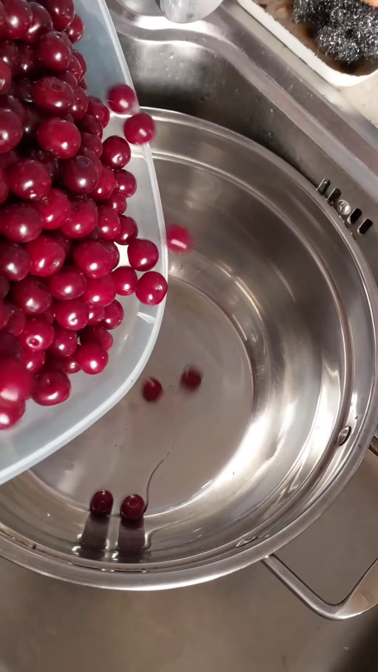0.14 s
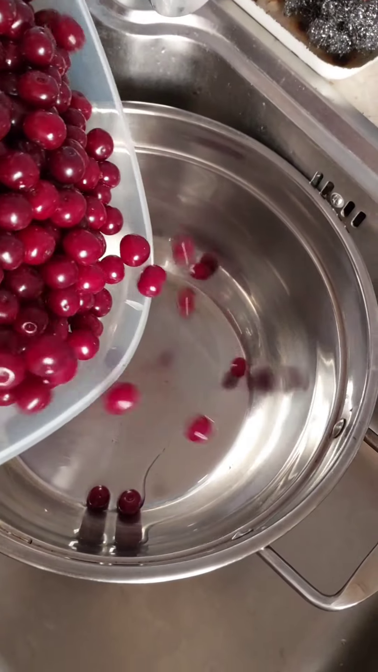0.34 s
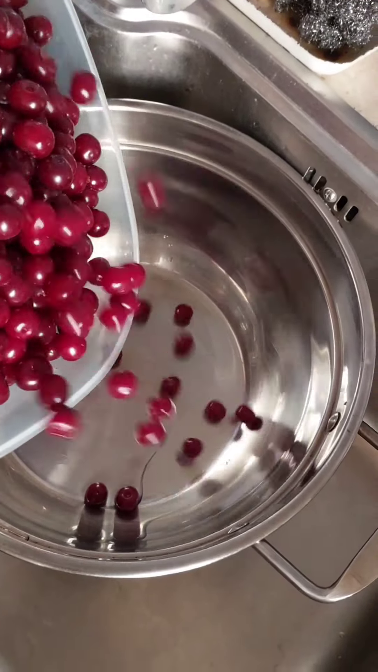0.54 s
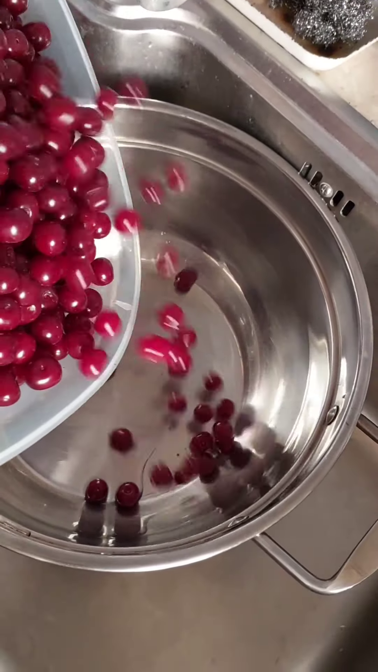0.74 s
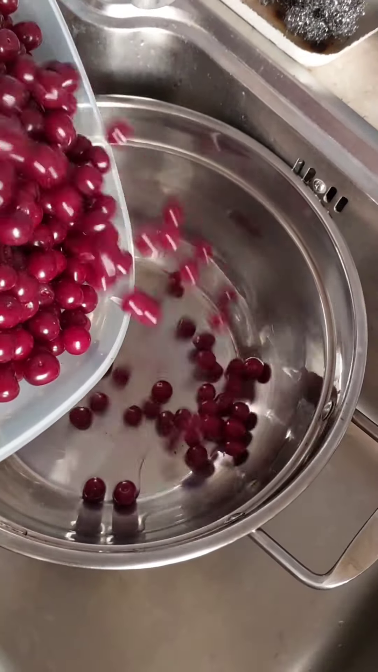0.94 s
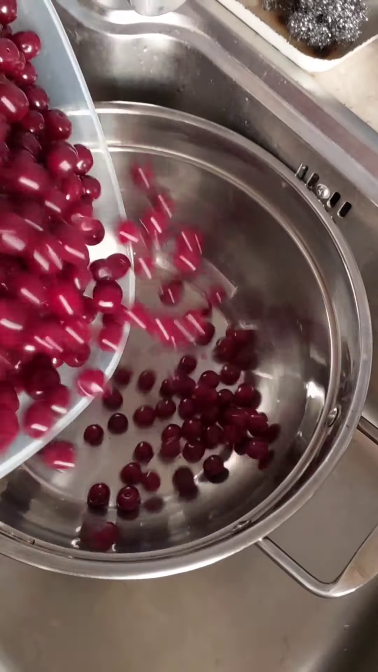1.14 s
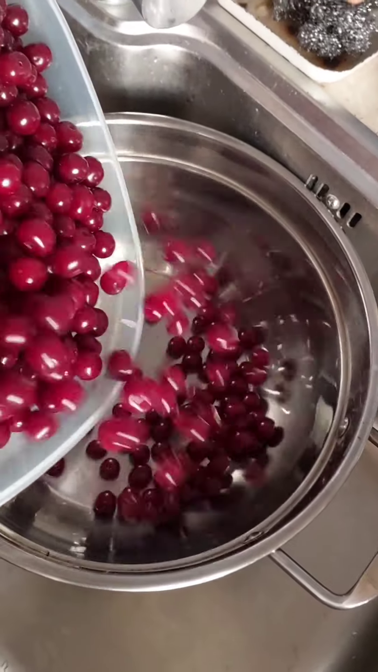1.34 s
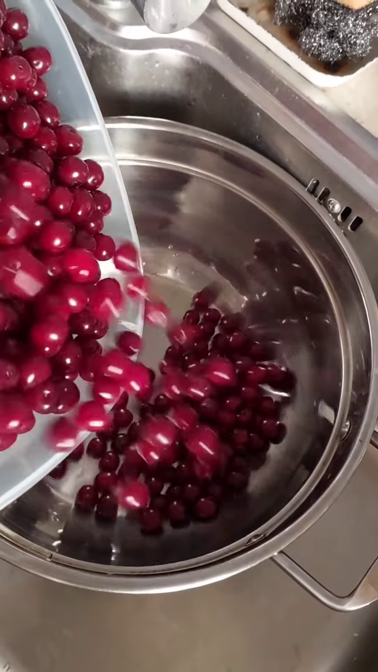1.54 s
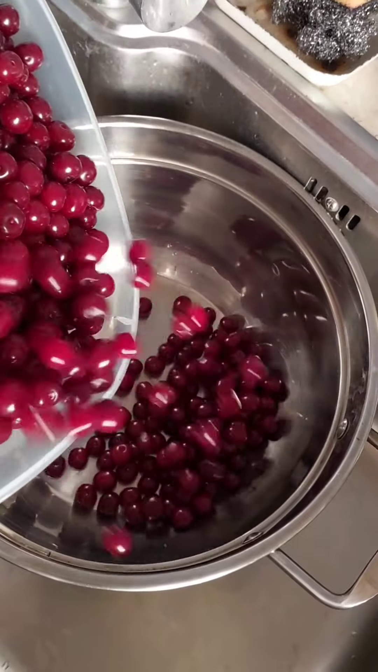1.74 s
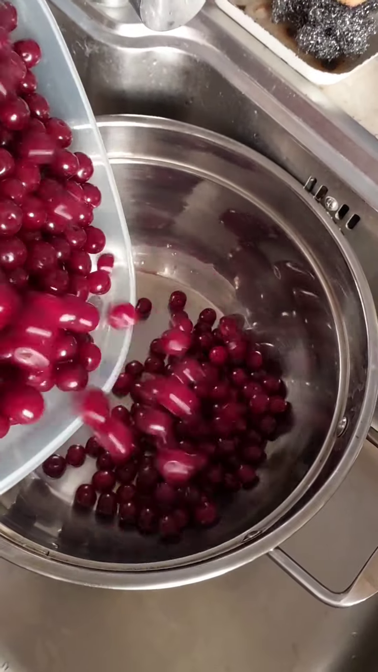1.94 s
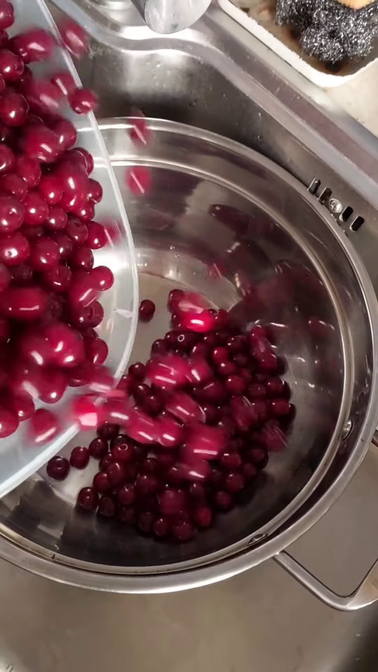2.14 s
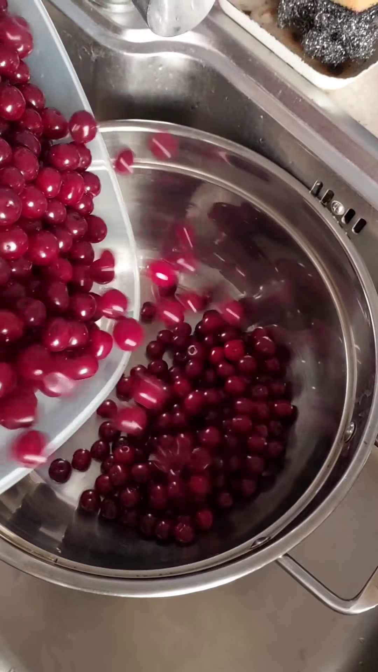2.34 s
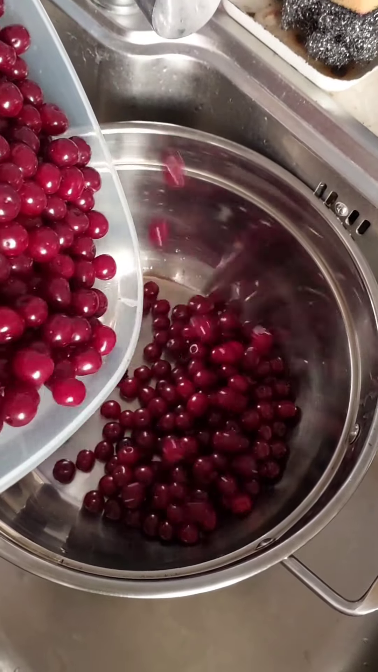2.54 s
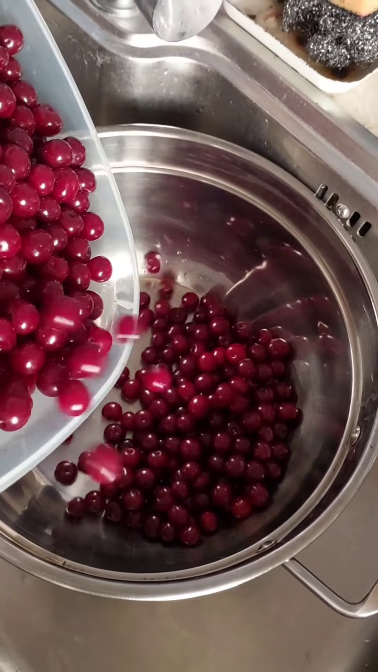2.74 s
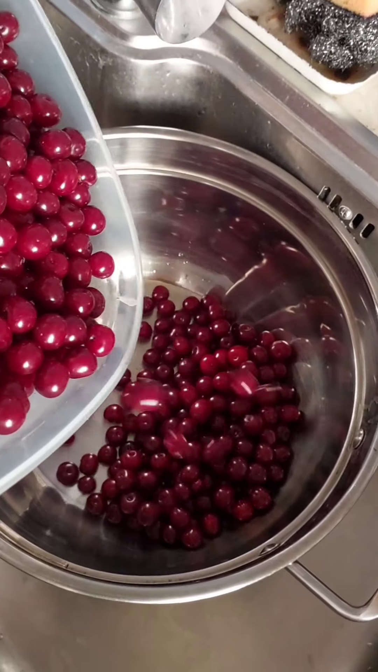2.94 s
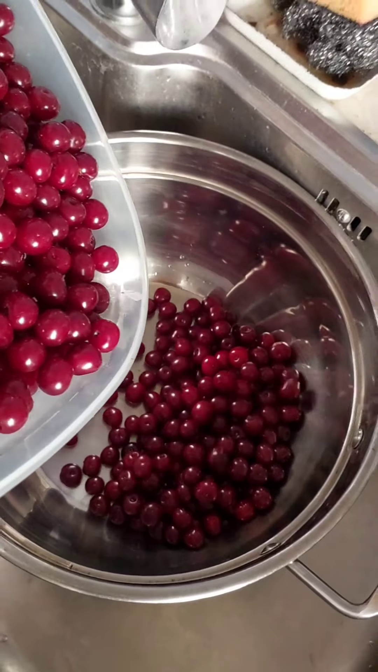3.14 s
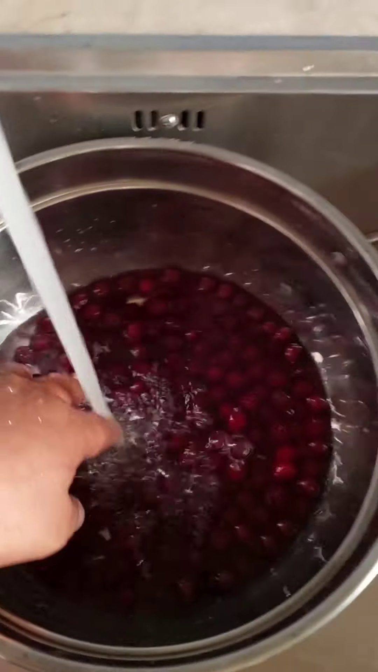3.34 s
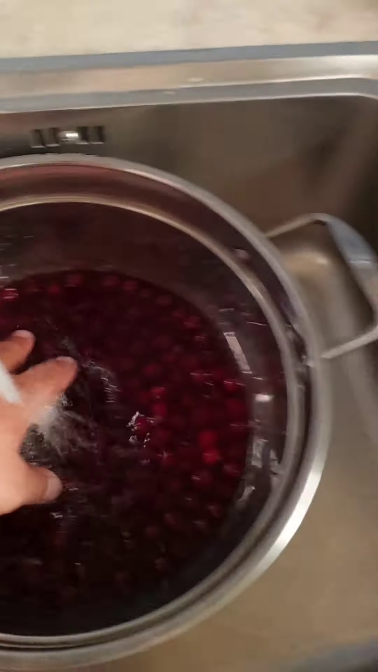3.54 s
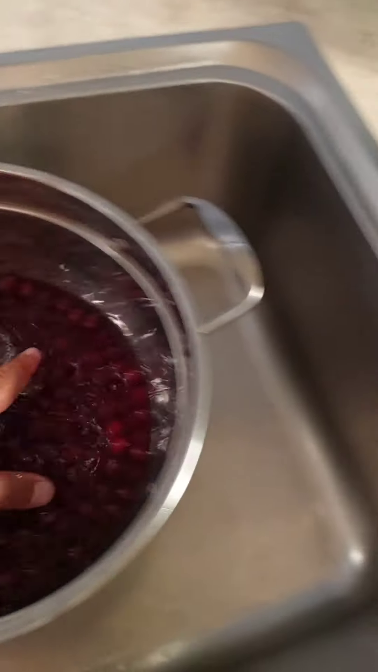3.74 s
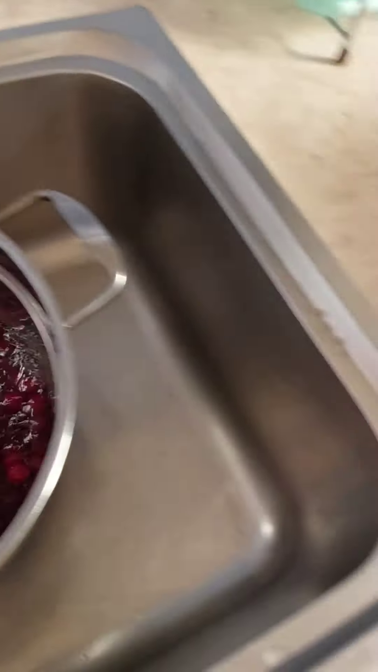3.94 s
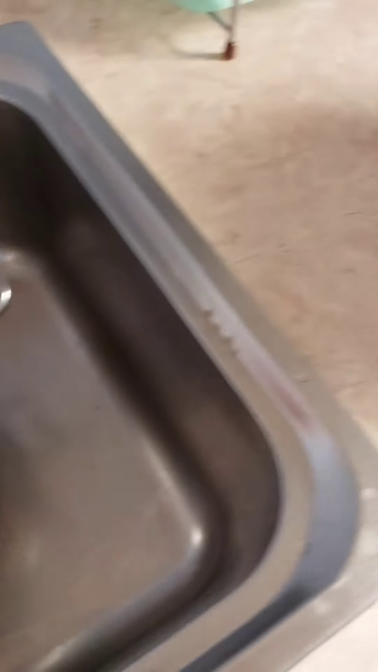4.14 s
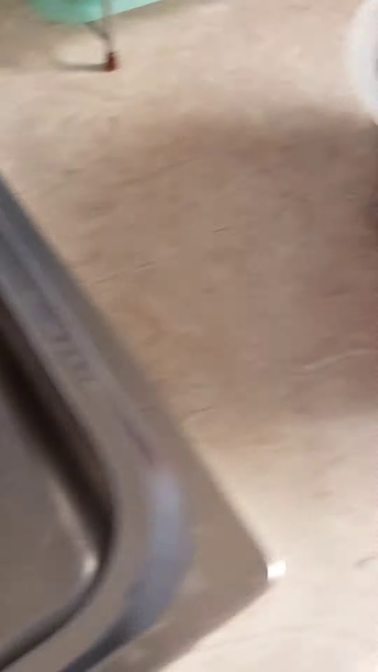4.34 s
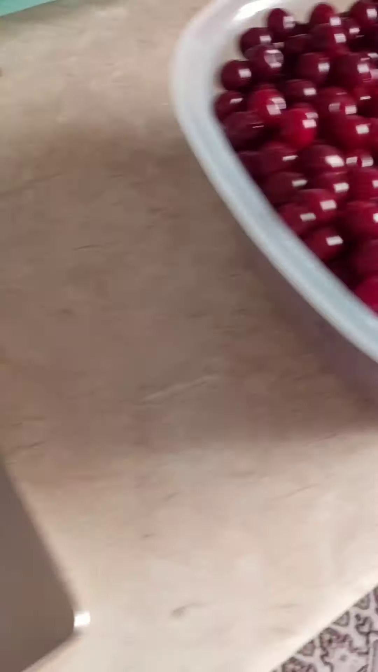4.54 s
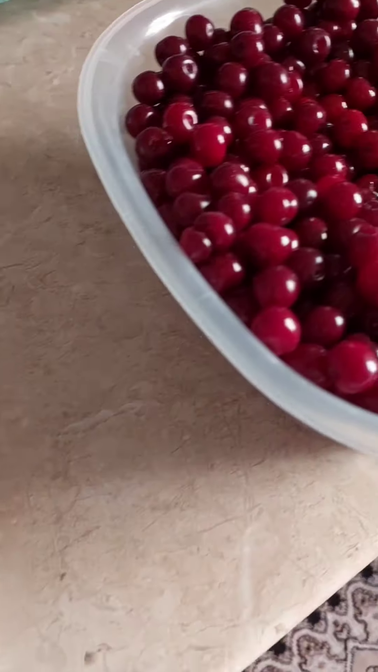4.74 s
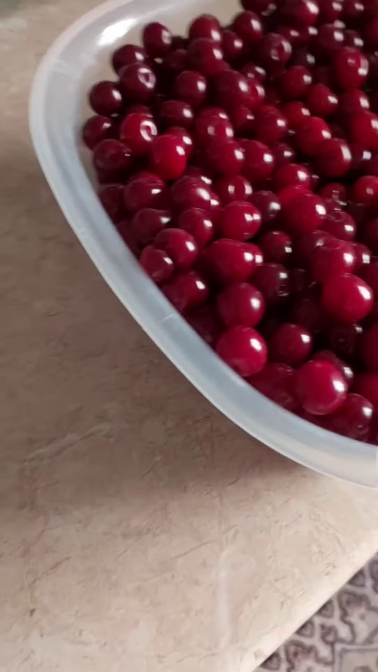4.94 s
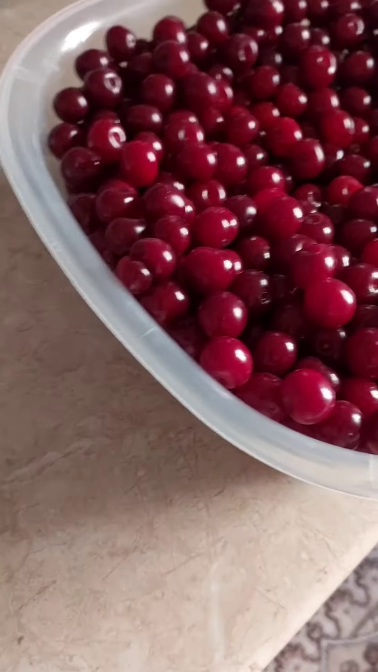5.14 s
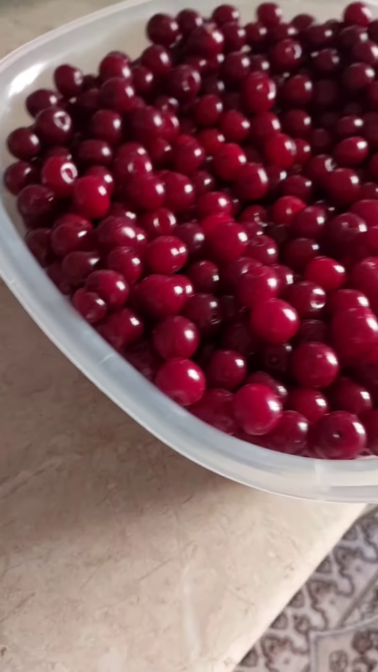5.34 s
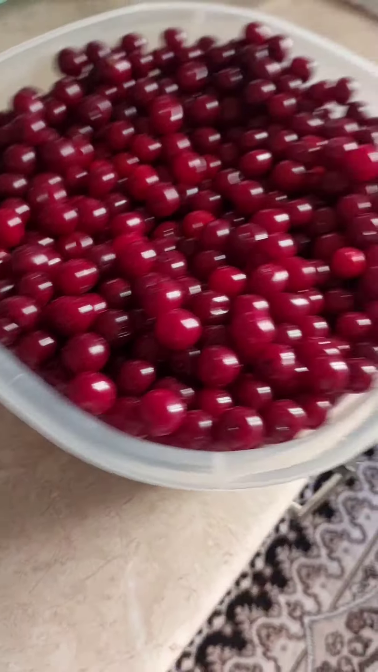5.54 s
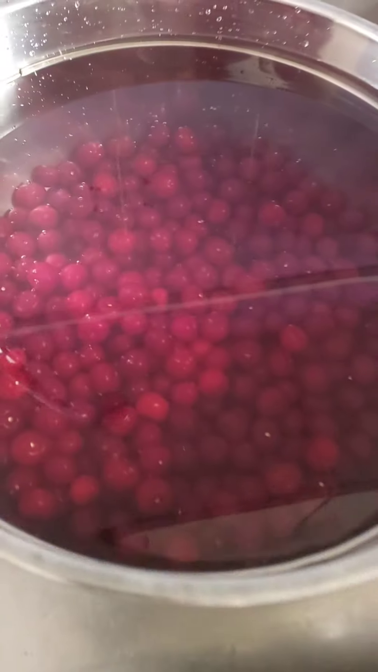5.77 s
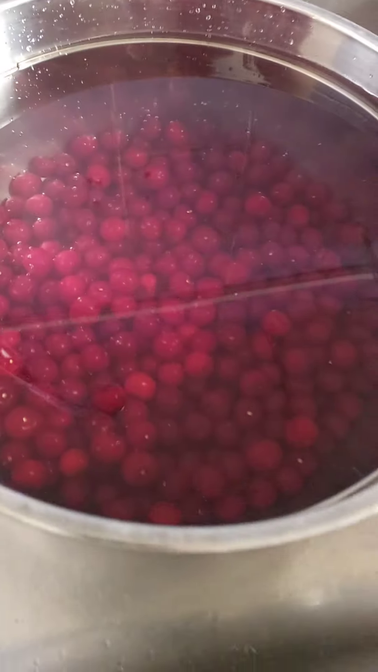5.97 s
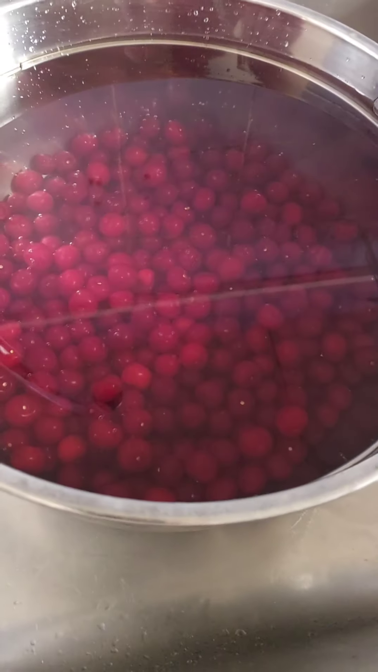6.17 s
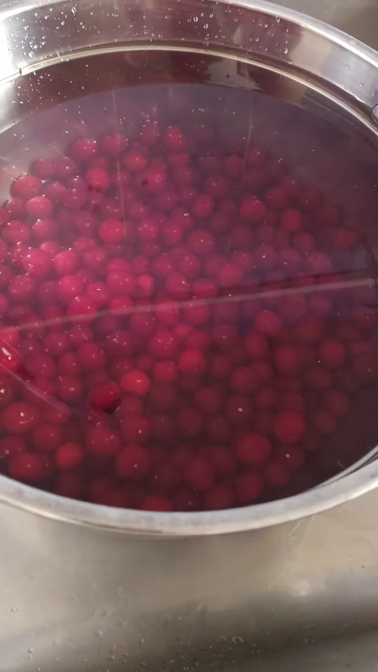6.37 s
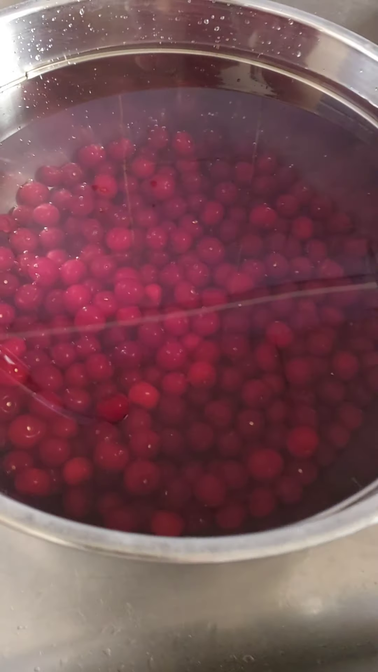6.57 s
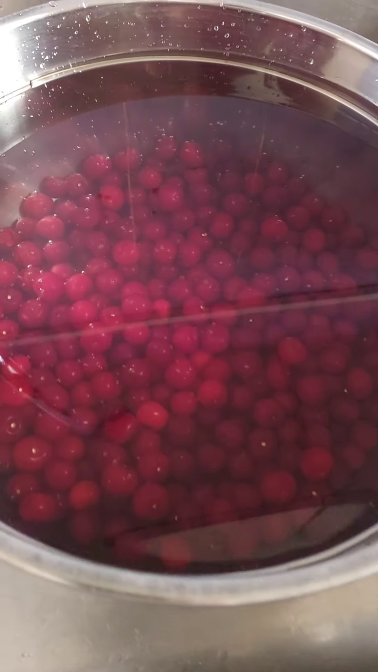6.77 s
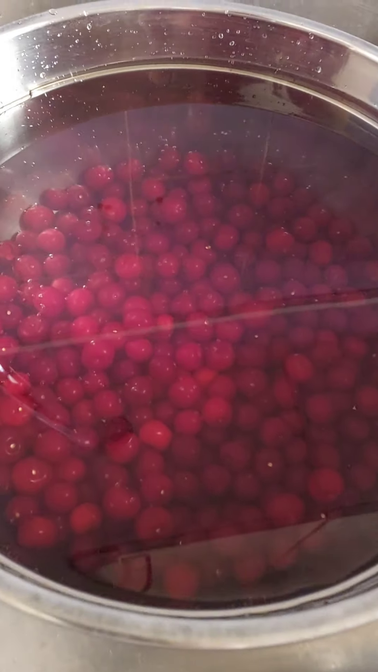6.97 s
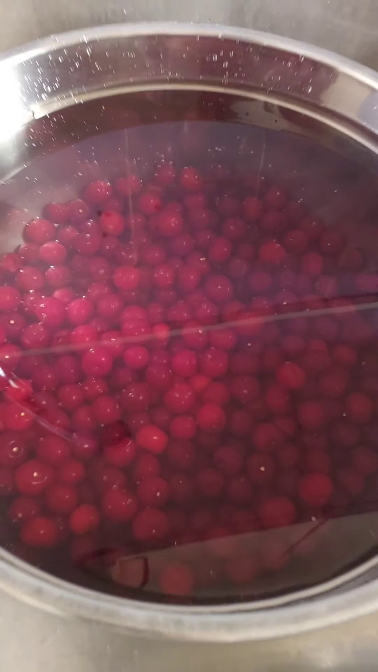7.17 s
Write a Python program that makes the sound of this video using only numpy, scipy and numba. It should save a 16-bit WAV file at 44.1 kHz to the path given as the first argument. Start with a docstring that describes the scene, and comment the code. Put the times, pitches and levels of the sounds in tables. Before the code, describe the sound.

Cherries patter and thud into a steel pot in a sink, then tap water splashes and gurgles before cutting abruptly to faint fridge hum.

```python
"""Cherries tumble from a plastic tub into a steel pot in a sink: thuds plus decaying modes, duller where
fruit covers the base, with filtered-noise skins, squeaks, taps and wall clacks.
Tap water splashes and gurgles into the pot over a stirring hand: swarms of short sines, echoed and
coloured, with an air pocket, big glugs and a ringing hollow. It stops abruptly.
After a near-silent blink only the kitchen is left: fridge hum, whirr and whine over room air."""
import sys
import numpy as np
from scipy import signal
from scipy.fft import rfft, irfft, next_fast_len
from scipy.io import wavfile
from numba import njit

SR = 44100
rng = np.random.default_rng(int(sys.argv[2]) if len(sys.argv) > 2 else 0)


def wrap_up_sound(samples):
    """Save the sound to the file named by the first command line argument, as 16-bit audio."""
    columns = np.atleast_2d(samples).T
    # keep every value between -1 and 1, then stretch to whole-number steps
    tamed = np.clip(columns, -1, 1)
    steps = np.round(tamed * 32767).astype(np.int16)
    wavfile.write(sys.argv[1], SR, steps)


N = 317914
TIME = np.arange(N) / SR
SIDES = np.array([[1], [-1]])  # left, right
TAP_ON_S, TAP_OFF_S = 3.186, 5.602

# Table levels are relative: functions add their own offsets.
# heavy cherries landing: t/s, level/dB, thud f/Hz, ring/dB (high on bare steel, low on fruit)
LANDINGS = [(0.01, -41.5, 276, -28), (0.045, -48, 327, -42), (0.259, -45.5, 383, -25),
            (0.318, -26, 480, -4.5), (0.383, -27.5, 525, 1), (0.417, -23, 500, -12),
            (0.434, -31.5, 450, -5), (0.455, -34, 410, -12), (0.497, -28, 396, -7), (0.53, -31.5, 414, -1),
            (0.545, -20, 540, -5), (0.571, -42, 480, -13), (0.612, -26, 456, 1), (0.644, -31, 380, -6),
            (0.667, -25.5, 523, 2), (0.683, -30, 540, 0), (0.7083, -24, 490, -6), (0.741, -31, 420, -12),
            (0.7605, -22.5, 553, 1.5), (0.795, -27, 500, -11), (0.826, -22.5, 530, -1.5),
            (0.867, -27, 298, 4.5), (0.884, -27.5, 395, -15), (0.903, -43, 360, -10), (0.937, -30, 510, -3),
            (0.961, -32, 340, -5), (0.987, -22.5, 529, -22), (1.024, -30.5, 504, 2),
            (1.039, -30.5, 430, 0.5), (1.076, -29, 315, -16), (1.113, -26.5, 338, -2),
            (1.129, -23, 360, -16), (1.155, -30, 524, -2), (1.172, -41, 420, 8), (1.196, -27.5, 507, 0.5),
            (1.22, -31, 397, 2), (1.246, -25.5, 545, 3), (1.261, -28.5, 480, 5.5), (1.29, -27, 378, -13),
            (1.325, -28, 508, -30), (1.359, -23.5, 297, -9.5), (1.383, -33, 400, -13),
            (1.426, -26.5, 505, -6), (1.457, -29.5, 356, -12), (1.494, -29, 306, -10),
            (1.523, -31, 350, -17), (1.549, -31.5, 393, -6.5), (1.594, -42, 414, -23),
            (1.625, -21, 345, -16), (1.663, -26.5, 343, -13.5), (1.689, -24.5, 370, -29),
            (1.706, -34, 360, -16), (1.7357, -34, 480, -15), (1.758, -40, 370, -18),
            (1.786, -27.5, 445, -8.5), (1.836, -35, 400, -22), (1.882, -45, 310, -30),
            (1.95, -36.5, 312, -25), (2.022, -28, 407, -15), (2.051, -28, 378, -16), (2.156, -24, 385, -13),
            (2.17, -28, 417, -22.5), (2.236, -29.5, 443, -11), (2.271, -37, 450, -17),
            (2.316, -30.5, 507, -12), (2.39, -28, 557, -8), (2.446, -41, 298, -20), (2.584, -39.5, 341, -5),
            (2.629, -43, 304, -7), (2.677, -41, 304, -18), (2.861, -37.5, 372, -21), (2.909, -47, 298, -23),
            (2.996, -49.5, 303, -27), (3.054, -39.5, 368, -31)]
# wet skins smacking: t/s, level/dB, hardness/dB (high = knock on steel, low = crackle of skin on skin)
SKIN_SMACKS = [(0.3169, -51, -2.5), (0.381, -51.5, 6), (0.418, -47.5, -11.5), (0.4965, -49, 9.5),
               (0.532, -44, 6), (0.615, -33.5, 2), (0.6628, -41.5, -9), (0.678, -40, 1), (0.706, -42.5, 4),
               (0.744, -47, -7), (0.761, -48, 8.5), (0.8244, -49.5, 7), (0.87, -38, 1.5), (0.934, -48.5, 5),
               (1.0051, -46, -17), (1.035, -45, 6), (1.115, -43, 2.5), (1.151, -52, 0),
               (1.194, -37.5, -7.5), (1.236, -39, -3), (1.258, -37.5, -5.5), (1.327, -40, -7.5),
               (1.492, -39.5, -6), (1.079, -51, 4), (1.464, -53, 7), (1.629, -64, -2), (1.737, -63.5, 0),
               (1.833, -42, -4), (1.9101, -55.5, -6), (1.9568, -50, -8), (2.026, -49, -2),
               (2.1854, -51.5, -11), (2.315, -45.5, -5), (2.332, -46.5, -6), (2.359, -42.5, -6),
               (2.389, -45, -9), (2.4455, -56, -10), (2.5822, -58, 2.5), (2.638, -54.5, -5),
               (2.929, -65.5, -1)]
# modes of the pot base and sink: f/Hz, level/dB, t60/s without fruit
BASE_MODES = [(57.3, -6.5, 0.71), (83.3, -3.5, 0.15), (103, -4, 0.29), (140, -10.5, 0.36),
              (189.7, -9, 0.51), (234.7, -12, 0.38), (260, -11, 0.17), (299.7, -7.5, 0.22),
              (324, -4.5, 0.08), (398.5, -10, 0.49), (464, -1, 0.08), (519, -3.5, 0.14), (550.5, -10, 0.16),
              (647, -12, 0.065), (847, -9.5, 0.15), (907, -5.5, 0.2), (872, -12.5, 0.1), (937, -10, 0.12),
              (1015, -8, 0.063)]
# fruit leaving the tub: t/s, flow/dB
FLOW = [(0.0, -60), (0.34, -48), (0.49, -43), (0.57, -29.5), (0.72, -34.5), (1.56, -34), (1.93, -39),
        (2.28, -32.5), (2.85, -52.5), (3.15, -55)]
# cover by fruit, fullest mid-pour: t/s, share of the pot base covered/0-1
COVER = [(0.4, 0.27), (1.27, 0.44), (1.45, 0.5), (2.4, 0.33)]
# splashing as the hand stirs under the jet: t/s, level/dB
SPLASHING = [(3.21, -38.5), (3.33, -36), (4.24, -37), (4.33, -31.5), (4.38, -43), (4.79, -42),
             (4.88, -35.5), (5.09, -47), (5.2, -40), (5.22, -28.5), (5.33, -47.5), (5.34, -36), (5.45, -43),
             (5.5, -32.5), (5.53, -42), (5.58, -40)]


def undb(db):
    """Decibels to amplitude ratio."""
    return 10 ** (np.asarray(db) / 20)


def unit(x):
    """Scale to rms 1."""
    return x / np.sqrt(np.mean(x ** 2) + 1e-20)


def curves(table, at=TIME):
    """Value columns of a table, interpolated at the given times."""
    s, *columns = np.transpose(table)
    return [np.interp(at, s, c) for c in columns]


def on_log_axis(hz, points):
    """Read (f/Hz, value) points on a log-frequency axis."""
    f, value = np.transpose(points)
    return np.interp(np.log(hz + 1e-3), np.log(f), value)


def colour(x, points):
    """Minimum-phase filter with the gain of (f/Hz, gain/dB) points, built from the cepstrum."""
    size = 4096
    hz = np.arange(size // 2 + 1) * SR / size
    cepstrum = irfft(np.log(undb(on_log_axis(hz, points))))
    cepstrum[1:size // 2] *= 2
    cepstrum[size // 2 + 1:] = 0
    impulse = irfft(np.exp(rfft(cepstrum)))
    return signal.fftconvolve(x, impulse[None], axes=1)[:, :x.shape[1]]


def place(x, pan):
    """Lean each frequency left or right by (f/Hz, left minus right/dB) points."""
    size = 2 ** 19
    hz = np.arange(size // 2 + 1) * SR / size
    gain = undb(SIDES * on_log_axis(hz, pan) / 2)
    return irfft(rfft(x, size) * gain)[:, :N]


def band(x, lo_hz, hi_hz, order=2):
    """Butterworth band-pass."""
    edges_hz = [lo_hz, min(hi_hz, .45 * SR)]
    return signal.sosfilt(signal.butter(order, edges_hz, "band", fs=SR, output="sos"), x)


def diffuse(apart_hz):
    """Noise alike at both ears in the bass, differing in the treble."""
    mid, side = rng.standard_normal((2, N))
    return mid + SIDES * signal.sosfilt(signal.butter(1, apart_hz, "high", fs=SR, output="sos"), side)


def between(start, end):
    """Gate with 4 ms edges."""
    return np.clip((TIME - start) / .004, 0, 1) * np.clip((end - TIME) / .004, 0, 1)


def add(out, s, sound):
    """Mix a sound in at time s."""
    i = int(np.clip(s * SR, 0, N - 1))
    out[:, i:i + sound.shape[1]] += sound[:, :N - i]


@njit
def grains(start, hz, cycles, size, glide, phase):
    """Decaying sines whose pitch rises by the share glide; the right ear gets its own phase."""
    out = np.zeros((2, N))
    for k in range(len(start)):
        length = int(cycles[k] * SR / hz[k]) + 2
        turn = 2 * np.pi * hz[k] / SR
        p = np.exp(1j * turn - 6. / length)
        rise = np.exp(1j * turn * glide / length)
        z = size[k] / np.sqrt(length) + 0j
        right = np.exp(1j * phase[k])
        first = int(start[k] * SR)
        for i in range(max(first, 0), min(first + length, N)):
            out[0, i] += z.imag
            out[1, i] += (z * right).imag
            z *= p
            p *= rise
    return out


def room(x, wet_db, t60_s):
    """Close steel and tile add a short dense tail: decaying band-limited noise."""
    t = np.arange(int(.5 * SR)) / SR
    tail = band(rng.standard_normal((2, len(t))), 346, 13000, order=1)
    tail = tail * np.exp(-np.log(1000) * t / t60_s) * np.minimum(t / 0.0028, 1)
    tail = band(tail, 160.0, 14900)
    tail /= np.sqrt(np.sum(tail ** 2) / 2)
    return x + undb(wet_db) * signal.fftconvolve(x, tail, axes=1)[:, :N]


def kitchen(hum_hz=63.6, hum_db=-44, early_db=-49, late_db=-47, rumble_db=-56, whine_hz=2620, whine_db=-84):
    """Wavering fridge hum and rumble over coloured air; a faint whine early, whirr bands at the end."""
    # air during pour and tap, then at the end: f/Hz, gain/dB
    air_early = [(50, -25), (85, -9), (99, -6.5), (113, -18.5), (183, -23.5), (338, -26), (440, -34),
                 (611, -29.5), (1260, -42.5), (3160, -64), (16000, -69)]
    air_late = [(50, -59), (85, -9.5), (129, 5.5), (204, -12), (266, -6), (369, -10.5), (403, -15.5),
                (470, -11), (906, -15.5), (1670, -22.5), (3160, -26), (4590, -29), (9250, -39.5),
                (11800, -38.5), (16000, -52)]
    # late whirr resonances: f/Hz, width/Hz, level/dB
    whirr_bands = [(122.5, 9.7, -58.5), (261, 40, -63), (461, 16, -59.5), (1488, 33, -61),
                   (1653, 320, -54.5), (4600, 280, -65.5), (5700, 620, -65.5), (6580, 480, -69),
                   (11530, 350, -74.5)]
    waver = unit(band(rng.standard_normal(N), 0.3, 0.94, order=1))
    phase = 2 * np.pi * np.cumsum(hum_hz + .5 * waver) / SR
    hum = np.sqrt(2) * np.sin(phase) * undb(hum_db)
    rumble = undb(rumble_db) * unit(band(diffuse(900), 25.0, 122, order=3))
    early = undb(early_db) * unit(colour(diffuse(650), air_early))
    early += undb(whine_db) * unit(band(diffuse(650), whine_hz - 35, whine_hz + 35))
    late = undb(late_db) * unit(colour(diffuse(630), air_late))
    for hz, width, db in whirr_bands:
        late += undb(db) * unit(band(diffuse(360), hz - width / 2, hz + width / 2))
    late = (late + whine()) * undb(SIDES * 0.74)
    return hum + rumble + np.where(TIME < TAP_OFF_S, early, late)


def skins(smack_db=3, knock_db=-2, crackle_db=-9, snap_s=0.01, slide_s=0.0066, slide_db=-7, rough_db=2.5,
          rustle_db=-28, rustle_cover_db=12):
    """Wet skins snap and slide in tiny slips over a rustle: gritty noise in three enveloped bands."""
    # f/Hz, gain/dB
    skin_gain = [(760, -39), (1300, -3), (1570, 7), (1730, -4), (1880, 4), (2110, -4.5), (2630, 5),
                 (3040, -10), (3680, 2), (3960, -1), (5480, 4), (8000, -14), (11700, -10), (16000, -15.5)]
    t = np.arange(int(.15 * SR)) / SR
    decay = np.exp(-t / snap_s) + undb(slide_db) * np.exp(-t / slide_s)
    shape = np.minimum(t / 0.0029, 1) * decay
    envelopes = np.zeros((3, N))  # power per band
    for s, db, hardness in SKIN_SMACKS:
        tilt = np.array([[knock_db + hardness], [0], [crackle_db - hardness]])
        add(envelopes, s, (undb(smack_db + db + tilt) * shape) ** 2)
    ticks = unit(undb(5 * np.repeat(rng.standard_normal(N // 160 + 1), 160)[:N]))
    rustle = ticks * undb(curves(FLOW)[0] + rustle_db + rustle_cover_db * curves(COVER)[0])
    envelopes += (rustle * undb([[-3], [-2], [-4]])) ** 2
    slips = undb(rough_db * np.repeat(rng.standard_normal(N // 32 + 1), 32)[:N])
    grit = colour(rng.standard_normal((2, N)) * slips, skin_gain)
    bands_hz = (1070, 3540), (3010, 7000), (8600, 21000)
    parts = [band(grit, lo, hi, order=3) for lo, hi in bands_hz]
    return sum(unit(part) * np.sqrt(e) for part, e in zip(parts, envelopes))


def clicks(click_db=-4.0, crack_db=-2, crack_s=0.0042, rattle_db=-12, rattle_range_db=9, low_hz=1300,
           high_hz=5200, ring_cycles=6):
    """Cherries tap each other and the wall: short sine plus noise crack; a random rattle follows the flow."""
    # sharp taps: t/s, level/dB, f/Hz
    taps = [(1.152, -31, 3470), (1.24, -39, 2620), (1.3278, -33, 1980), (1.4966, -32, 2730),
            (1.574, -61, 2300), (1.670, -44, 1490), (1.688, -37.5, 1860), (1.705, -38, 1750),
            (1.817, -40, 3460), (1.8375, -39, 1510), (1.9964, -50, 1530), (2.0274, -35, 2700),
            (2.032, -38, 2740), (2.061, -54, 2550), (2.186, -47, 1220), (2.3155, -39, 2900),
            (2.334, -43, 2570), (2.357, -41, 2650), (2.37, -42, 2700), (2.4463, -41, 3270),
            (2.478, -57, 2750), (2.5825, -65, 1570)]
    t = np.arange(int(.08 * SR)) / SR
    when, size, pitch = rng.random(size=(260, 3)).T
    when = when * TAP_ON_S
    level = curves(FLOW, when)[0] + rattle_db - rattle_range_db * size
    rattle = np.column_stack([when, level, low_hz * (high_hz / low_hz) ** pitch])
    out = np.zeros((2, N))
    for s, db, hz in np.vstack([taps, rattle]):
        tick = np.sin(2 * np.pi * hz * t + SIDES * rng.uniform(-4.4, 1)) * np.exp(-t * hz / ring_cycles)
        crack = unit(band(rng.standard_normal((2, len(t))), hz / 1.26, hz * 1.65)) * np.exp(-t / crack_s)
        add(out, s, undb(db + click_db) * (tick + undb(crack_db) * crack))
    return out


def squeaks(squeak_db=1, overtone_db=-4.0, start_hz=5150, end_hz=6200, rise_s=0.01126, peak_s=0.0089,
            rasp_db=-1):
    """Skin sticks and slips on skin, unevenly and ever faster: a wobbling rising tone, octave and rasp."""
    # wet skins squeezing past each other: t/s, level/dB
    squeezes = [(0.003, -57), (0.038, -61.5), (0.416, -49.5), (0.775, -37.5), (0.802, -45), (0.9815, -38),
                (1.0023, -44), (1.1266, -45), (1.186, -35.5), (1.358, -45.5), (1.422, -36), (1.626, -43.5),
                (1.785, -46), (2.0175, -42), (2.094, -49), (2.156, -39.5), (2.236, -42.5), (2.56, -49.5),
                (2.612, -48.5), (2.9945, -61.5), (3.052, -59)]
    t = np.arange(int(.1 * SR)) / SR
    out = np.zeros((2, N))
    for s, db in squeezes:
        chance = rng.standard_normal((2, 2, len(t)))
        wobble = .11 * unit(band(chance[0], 60, 1800, order=1)) + .025 * rng.standard_normal()
        hz = (end_hz + (start_hz - end_hz) * np.exp(-t / rise_s)) * (1 + wobble)
        phase = 2 * np.pi * np.cumsum(hz, axis=1) / SR
        swell = t / peak_s * np.exp(1 - t / peak_s)
        rasp = undb(rasp_db) * 0.69 * unit(band(chance[1], 6300, 13000, order=1))
        top = 0.42 * np.sin(2 * phase) + rasp
        tone = swell ** 1.02 * np.sin(phase)
        add(out, s, undb(db + squeak_db) * (tone + undb(overtone_db) * swell * top))
    return out


def strike(t, rings, cover, thud_hz, ring_db, boom_db, scatter_db, spread=0.92, thud_db=1, thud_s=0.0063,
           shorter=0.7, damping_per_s=24, detune=0.0066, thud_spread=0.5):
    """One cherry: a short thud, then randomly detuned pot and sink modes; fruit cover shortens both."""
    hz, db, _ = np.transpose(BASE_MODES)
    chance = rng.standard_normal((4, len(hz)))
    upper = hz > 700
    # a low thud weakens the middle base modes, around 460-650 Hz
    reach_db = min(thud_hz - 520, 0) / 22
    tilt = [(190, boom_db), (280, 0), (400, 0.0064), (620, reach_db), (830, ring_db)]
    db = db + on_log_axis(hz, tilt)
    phase = SIDES * spread * np.minimum(hz / 900, 2) * chance[1] + upper * np.pi * (chance[2] > 0)
    weights = undb(db + scatter_db * chance[0]) * np.exp(1j * phase)
    rings = rings * np.exp(-damping_per_s * cover * t)
    modes = 0
    # random weights share the energy among the modes; each group's total stays fixed
    for group in (~upper, upper):
        sound = (weights[:, group] @ rings[group]).imag
        energy = undb(2 * db[group]) @ np.sum(np.abs(rings[group]) ** 2, axis=1)
        modes = modes + sound * np.sqrt(energy / (np.sum(sound ** 2) + 1e-20))
    modes = np.array([np.interp(t * (1 + detune * chance[3, 0]), t, ear) for ear in modes])
    swell = t / (thud_s * (1 - shorter * cover))
    thud = np.sin(2 * np.pi * thud_hz * t - SIDES * thud_spread * thud_hz / 900)
    return modes + undb(thud_db) * (swell * np.exp(1 - swell)) ** 2 * thud


def cherries(blow_db=1, contact_s=0.0029, bounce_s=.05, jostle_db=-5, jostle_range_db=5, jostle_boom_db=4,
             bounces=3):
    """Heavy landings excite the modes, each followed by bounces at levels set by the flow."""
    # boom varies little with landing level and rises with cover
    boom_base_db, boom_follows, boom_covered_db = -38, 0.098, 20
    ring_empty_db, ring_covered_db = -3, -28  # bounces: empty pot, change at full cover
    t = np.arange(int(.3 * SR)) / SR
    hz, _, t60 = np.transpose(BASE_MODES)[:, :, None]
    # complex modes take any phase; soft fruit pushes for milliseconds, so they swell in
    push = np.sin(np.pi / 2 * np.minimum(t / contact_s, 1)) ** 2
    rings = np.exp((2j * np.pi * hz - np.log(1000) / t60) * t) * push
    out = np.zeros((2, N))
    for s, db, thud_hz, ring in LANDINGS:
        cover = curves(COVER, s)[0]
        boom = min(boom_base_db + boom_covered_db * cover + boom_follows * db - db, 2.5)
        add(out, s, undb(db + blow_db) * strike(t, rings, cover, thud_hz, ring, boom, scatter_db=4.5))
    times = np.repeat([row[0] for row in LANDINGS], bounces)
    for s, (delay, size, pitch) in zip(times, rng.random(size=(len(times), 3))):
        when = s + delay * bounce_s
        flow, cover = curves(FLOW, when)[0], curves(COVER, when)[0]
        ring = ring_empty_db + ring_covered_db * cover
        thud_hz = 270 + 340 * pitch - 70 * cover
        bounce = strike(t, rings, cover, thud_hz, ring, jostle_boom_db, scatter_db=6.0)
        add(out, when, undb(flow + jostle_db - jostle_range_db * size) * bounce)
    return out


def steel(smack_ring_db=1, blow_ring_db=-14.0, covered_db=-9, clack_db=-3, scatter_db=4, rebound_s=0.057,
          rebound_db=-4, grain_db=4, clack_s=.008):
    """Smacks, landings and rebounds clack on the wall and ring shifted modes, quieter as fruit covers."""
    # thin steel wall modes: f/Hz before random shift, level/dB, t60/s
    wall = [(1553, -1, .09), (1608, 5, .11), (1830, 2.5, 0.18), (2140, -4, .07), (2430, -9, .12),
            (2560, -15, .08), (2550, 6, 0.16), (2790, -17, 0.09), (3260, 9, 0.092), (3550, 4, 0.054),
            (4134, -33, .05), (4470, 7, .06)]
    t = np.arange(int(.2 * SR)) / SR
    hz, db, t60 = np.transpose(wall)
    landings = [(s, level + ring + blow_ring_db) for s, level, _, ring in LANDINGS]
    rebounds = [(s + rebound_s * rng.uniform(0.24, 1), level + rebound_db) for s, level in landings]
    smacks = [(s, level + hardness + smack_ring_db) for s, level, hardness in SKIN_SMACKS]
    out = np.zeros((2, N))
    for s, level in smacks + landings + rebounds:
        shifted = hz * (1 + .018 * rng.standard_normal(len(hz)))
        rings = np.exp((2j * np.pi * shifted - np.log(1000) / t60)[:, None] * t)
        gains = undb(db + scatter_db * rng.standard_normal(len(hz)))
        weights = gains * np.exp(2j * np.pi * rng.random((2, len(hz))))
        grain = undb(grain_db * np.repeat(rng.standard_normal(len(t) // 64 + 1), 64)[:len(t)])
        clack = unit(band(grain * rng.standard_normal((2, len(t))), 1200, 3500)) * np.exp(-t / clack_s)
        sound = (weights / np.linalg.norm(weights[0]) @ rings).imag + undb(clack_db) * clack
        gain = undb(level + covered_db * curves(COVER, s)[0])
        add(out, s, gain * sound * np.minimum(t / .002, 1))
    return out


def bubbles(count, lo_hz, hi_hz, cycles, spread_db, glide, apart):
    """Swarm of bubbles and drops of random pitch, life and size; rms 1 over the tap's run."""
    when, pitch, life, size, side = rng.random((count, 5)).T
    start = TAP_ON_S + when * (TAP_OFF_S - TAP_ON_S)
    hz = lo_hz + pitch * (hi_hz - lo_hz)
    sizes = undb(-spread_db * np.log(1 - .99 * size))
    swarm = grains(start, hz, cycles * (.5 + life), sizes, float(glide), apart * np.pi * (2 * side - 1))
    return unit(swarm) * np.sqrt((TAP_OFF_S - TAP_ON_S) / (N / SR))


def gurgling(gurgle_db=-1, big_below_hz=340, attack_s=0.018, release_s=0.03):
    """Big bubbles ring the air pocket: a fading trickle, louder at once as the jet plunges past the hand."""
    # pocket of air under the jet: f/Hz, gain/dB
    pocket_gain = [(120, -43.5), (190, -11.5), (240, -16), (290, -2.5), (350, -4.5), (400, -1), (455, 4.5),
                   (520, -1), (600, -13.5), (830, -10), (1100, -29), (1600, -34)]
    # jet plunging: from t/s, to t/s, level/dB, biggest bubbles/dB
    plunge_rows = [(3.175, 3.34, -43, 8), (4.3, 4.854, -41.5, 2), (5.211, 5.287, -39, -2),
                   (5.33, 5.481, -38.5, -7), (5.508, 5.6, -34.5, -0.5)]
    pocket_hz, pocket_width_hz = 397.5, 32
    trickle_db, trickle_db_per_s = -42, -8
    swarm = bubbles(count=1700, lo_hz=188.0, hi_hz=1220, cycles=47.0, spread_db=-0.35, glide=0.028, apart=0.24)
    swarm = unit(colour(swarm, pocket_gain))
    biggest = signal.sosfiltfilt(signal.butter(4, big_below_hz, fs=SR, output="sos"), swarm)
    pocket = unit(band(swarm, pocket_hz - pocket_width_hz / 2, pocket_hz + pocket_width_hz / 2))
    trickle = undb(trickle_db + trickle_db_per_s * np.maximum(TIME - TAP_ON_S, 0))
    out = unit(swarm + pocket) * trickle
    for start, end, db, big_db in plunge_rows:
        attack = np.clip((TIME - start) / attack_s, 0, 1)
        envelope = attack * np.exp(-np.maximum(TIME - end, 0) / release_s)
        out = out + undb(db) * envelope * (swarm + (undb(big_db) - 1) * biggest)
    return out * undb(gurgle_db)


def shifting_echoes(x, shift_hz=3.5):
    """Quick echoes between steel walls; three patterns wax and wane as the hand and the water move."""
    patterns = [room(x, wet_db=-7, t60_s=.03) - x for _ in range(3)]
    turn = 2 * np.pi * shift_hz * TIME
    echoes = sum(p * np.sin(turn * rng.uniform(0.502, 1) + 2 * np.pi * rng.random()) for p in patterns)
    return x + np.sqrt(2 / 3) * echoes


def water(splash_db=3.0, fizz_db=-8.0, hiss_db=-9, flutter_db=1.45, drum_db=-45, drum_db_per_s=-4.5):
    """The jet breaks into drops, fizz and hiss, echoed off steel in three bands; it gurgles and drums."""
    # f/Hz, gain/dB
    splash_gain = [(350, -54), (600, -6.5), (737, -16), (834, -5.5), (1040, -14), (1430, -10.5), (1590, -6),
                   (1750, -10), (2680, -0.5), (3480, -5), (5120, 1), (7940, -9.5), (11800, -6.5),
                   (15100, -6), (16000, -14)]
    # f/Hz, left minus right/dB
    tap_pan = [(100, -12), (480, -1), (1200, 1), (8000, 3), (14000, -2)]
    # spray and slap follow a share of the splashing's swings and sink as the water deepens
    spray_db, spray_follows, spray_db_per_s = 4, 0.43, -1
    slap_db, slap_follows, slap_db_per_s = -3.5, 0.2, -1.4
    splash, usual = curves(SPLASHING)[0], np.mean(SPLASHING, axis=0)[1]
    filling_s = np.clip(TIME, TAP_ON_S, TAP_OFF_S) - (TAP_ON_S + TAP_OFF_S) / 2
    spray = usual + spray_db + spray_follows * (splash - usual) + spray_db_per_s * filling_s
    slap = usual + slap_db + slap_follows * (splash - usual) + slap_db_per_s * filling_s
    drops = bubbles(count=14000, lo_hz=765, hi_hz=15100, cycles=1.27, spread_db=-3.0, glide=0, apart=1.0)
    fizz = bubbles(count=2000, lo_hz=708, hi_hz=12960, cycles=70, spread_db=3.0, glide=0.077, apart=0.88)
    flutter = unit(band(rng.standard_normal(N), 1.5, 37, order=1))
    hiss = rng.standard_normal((2, N)) * between(TAP_ON_S, TAP_OFF_S)
    surface = drops + undb(fizz_db) * fizz + undb(hiss_db) * hiss
    surface = colour(shifting_echoes(surface), splash_gain) * undb(flutter_db * flutter)
    running = np.sqrt((TAP_OFF_S - TAP_ON_S) / (N / SR))
    levels = (440, 2570, slap), (3250, 6770, splash + splash_db), (9620, 24200, spray)
    out = 0
    for lo_hz, hi_hz, db in levels:
        out = out + running * unit(band(surface, lo_hz, hi_hz, order=3)) * undb(db)
    out += running * gurgling() + hollow() + glugs() + splashes() + pops()
    # the stream drums on the sink through the pot, less as the water deepens
    drum = undb(drum_db + drum_db_per_s * (TIME - TAP_ON_S)) * unit(band(diffuse(1300), 86.0, 119.5, order=3))
    return place(out, tap_pan) + drum * between(TAP_ON_S, TAP_OFF_S)


def clumps(rows, count, cycles=40, pitch_spread=0.182, spread_db=3, glide=0.055):
    """Each (t/s, level/dB, f/Hz, length/s) row sheds bubbles of similar pitch within its length."""
    s, db, hz, length = np.repeat(rows, count, axis=0).T
    delay, side = rng.random((len(s), 2)).T
    pitch, size = rng.standard_normal((len(s), 2)).T
    hz = hz * np.exp(pitch_spread * pitch)
    sizes = undb(db + spread_db * size) * np.sqrt(cycles * SR / hz)
    lives = np.full(len(s), float(cycles))
    return grains(s + delay * length, hz, lives, sizes, float(glide), np.pi * (2 * side - 1))


def splashes(big_db=-6, small_db=-39.5, low_hz=1900, high_hz=7500, length_s=0.015, follows=0.22):
    """Bubble clumps: big splashes off the hand, and random small ones that follow the splashing."""
    # t/s, level/dB, f/Hz, length/s
    big_rows = [(3.191, -29.5, 2380, .008), (3.282, -27.5, 2540, 0.018), (3.293, -25.5, 5070, 0.011),
                (3.355, -27, 5600, .015), (3.632, -30, 3830, .012), (3.655, -24, 6100, 0.019),
                (3.8, -24, 5700, .015), (3.974, -35.5, 2570, .006), (3.918, -44, 1270, 0.011),
                (3.996, -27, 4450, 0.0082), (4.028, -29.5, 3060, 0.012), (4.134, -27.5, 5170, 0.013),
                (4.253, -39, 5400, .008), (4.255, -29, 2600, 0.0063), (4.27, -29.5, 2640, 0.037),
                (4.304, -27, 2390, 0.031), (4.332, -33, 3840, .02), (4.529, -28, 5800, .012),
                (4.562, -27.5, 5000, .015), (4.69, -28.5, 5200, 0.012), (5.191, -32, 5070, .012),
                (5.229, -27, 5000, 0.0066), (5.24, -34, 4634, 0.028), (5.335, -29.5, 5065, 0.019),
                (5.567, -29.5, 3570, 0.012)]
    when, pitch = rng.random(size=(110, 2)).T
    s = TAP_ON_S + when * (TAP_OFF_S - TAP_ON_S)
    db = small_db + follows * (curves(SPLASHING, s)[0] - np.mean(SPLASHING, axis=0)[1])
    hz = low_hz * (high_hz / low_hz) ** pitch
    small = np.column_stack([s, db, hz, np.full(len(s), length_s)])
    return undb(big_db) * clumps(big_rows, count=36) + clumps(small, count=6)


def glugs(glug_db=-4.5, rise_per_s=0.456):
    """A big bubble swells, rings and rises a little in pitch as it nears the surface."""
    # t/s, peak/dB, initial f/Hz, swell/s
    big_bubbles = [(3.2, -29, 407, 0.0054), (3.234, -23.5, 403, 0.0065), (3.287, -27, 513, 0.0099),
                   (4.324, -22.5, 446, 0.005), (4.368, -27, 468, 0.0077), (4.41, -36, 268.7, 0.045),
                   (4.565, -39.5, 840, 0.014), (4.635, -41, 419, 0.014), (4.715, -32, 312, 0.014),
                   (4.82, -53, 605, 0.0095), (5.15, -43, 636, 0.074), (5.321, -26.5, 418, 0.01),
                   (5.41, -31, 404, 0.047), (5.465, -35.5, 830, 0.014), (5.5, -34, 622, 0.0074),
                   (5.57, -37, 830, 0.014), (5.578, -36, 644, .009)]
    t = np.arange(int(.3 * SR)) / SR
    out = np.zeros((2, N))
    for s, db, hz, swell_s in big_bubbles:
        envelope = (t / swell_s * np.exp(1 - t / swell_s)) ** 2
        phase = 2 * np.pi * hz * t * (1 + rise_per_s * t / 2)
        add(out, s, undb(db + glug_db) * envelope * np.sin(phase + SIDES * rng.uniform(-0.4, 0.39)))
    return out


def hollow(throb_db=1.5, wobble=0.018, apart=0.25):
    """The hollow dug by the jet rings on one gliding pitch, throbbing as bubbles break away."""
    # t/s, f/Hz, level/dB
    glide_rows = [(4.3, 450, -72), (4.33, 464.5, -42), (4.38, 438.4, -54), (4.46, 477, -40.5),
                  (4.53, 468.4, -45), (4.56, 476, -39), (4.615, 456.5, -32.5), (4.655, 402, -42),
                  (4.69, 453.7, -33), (4.78, 444, -43), (4.85, 442, -35.5), (4.94, 430, -76),
                  (5.19, 445, -78), (5.225, 448, -40), (5.26, 448, -35.5), (5.3, 442, -48),
                  (5.36, 445, -35), (5.45, 454.5, -39.5), (5.49, 444, -49), (5.53, 469, -39),
                  (5.59, 482, -35)]
    hz, db = curves(glide_rows)
    throb, drift = (unit(band(noise, 18.3, 51)) for noise in rng.standard_normal((2, N)))
    phase = 2 * np.pi * np.cumsum(hz * (1 + wobble * drift)) / SR
    gate = between(glide_rows[0][0], TAP_OFF_S)
    return undb(db + throb_db * throb) * np.sin(phase + SIDES * apart) * gate


def pops(swell_s=0.0004):
    """Two bubbles burst in quick succession, each with a very short ping, nearer the right ear."""
    # t/s, peak/dB, f/Hz
    bursts = [(5.2215, -15, 4880), (5.2289, -11.5, 4850)]
    t = np.arange(int(.02 * SR)) / SR
    swell = t / swell_s * np.exp(1 - t / swell_s)
    out = np.zeros((2, N))
    for s, db, hz in bursts:
        add(out, s, undb(db - 2 * SIDES) * swell * np.sin(2 * np.pi * hz * t + SIDES * 0.46))
    return out


def whine(centre_hz=1725, sway_hz=32, width_hz=22, whine_db=-59):
    """The fridge's narrow whine: band noise swaying slowly in pitch by a frequency shift."""
    sway = unit(band(rng.standard_normal(N), 0.44, 2))
    turn = np.exp(2j * np.pi * np.cumsum(sway_hz * sway) / SR)
    narrow = unit(band(diffuse(360), centre_hz - width_hz / 2, centre_hz + width_hz / 2))
    return undb(whine_db) * (signal.hilbert(narrow, next_fast_len(N))[:, :N] * turn).real


def scene(quiet_from_s=5.644):
    """Pour, then tap, over the kitchen; pour and tap end abruptly and the kitchen dips by up to 40 dB."""
    # f/Hz, left minus right/dB
    pour_pan = [(100, 1), (380, -1.5), (600, -5), (1200, -2), (2400, -1), (8000, -0.5), (15000, -6)]
    blows = room(cherries(), wet_db=-5.0, t60_s=0.32)
    contacts = room(skins() + steel() + clicks() + squeaks(), wet_db=-8.5, t60_s=0.27)
    pour = place(blows + contacts, pour_pan)
    tap = room(water(), wet_db=-8.0, t60_s=0.38)
    dip = 1 - .99 * between(TAP_OFF_S, quiet_from_s)
    return (pour + tap) * between(-1, TAP_OFF_S + 0.00016) + kitchen() * dip


def record(dry):
    """Cut the deepest bass below 42 Hz and the top above 15.95 kHz."""
    thin = signal.sosfilt(signal.butter(4, 42, "high", fs=SR, output="sos"), dry)
    return signal.sosfilt(signal.ellip(10, .2, 70, 15950, fs=SR, output="sos"), thin)


dry = scene()
out = record(dry)
wrap_up_sound(out)
```